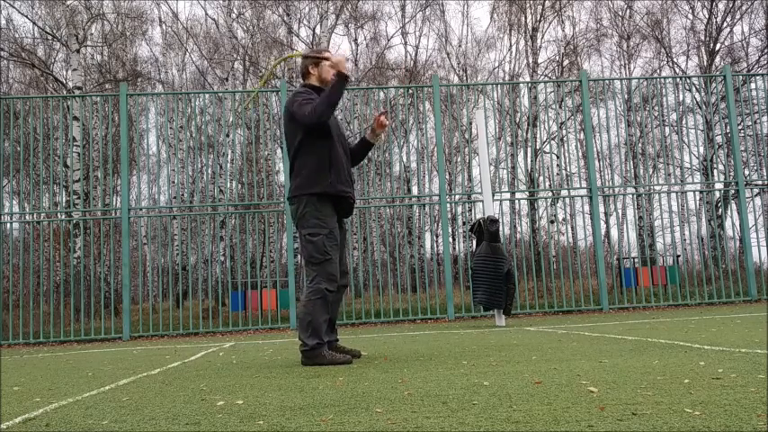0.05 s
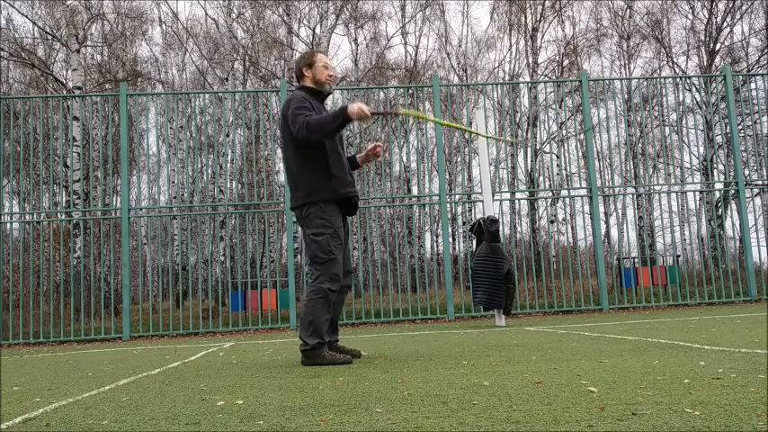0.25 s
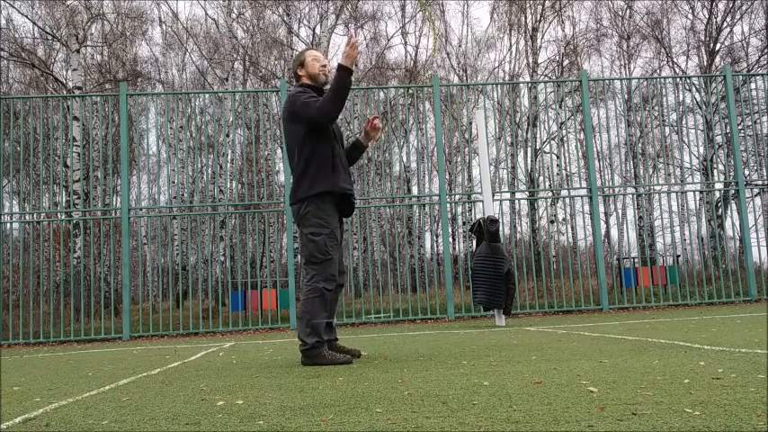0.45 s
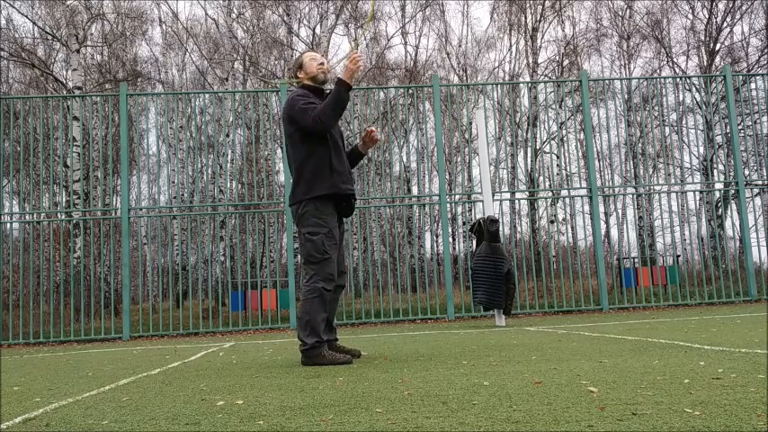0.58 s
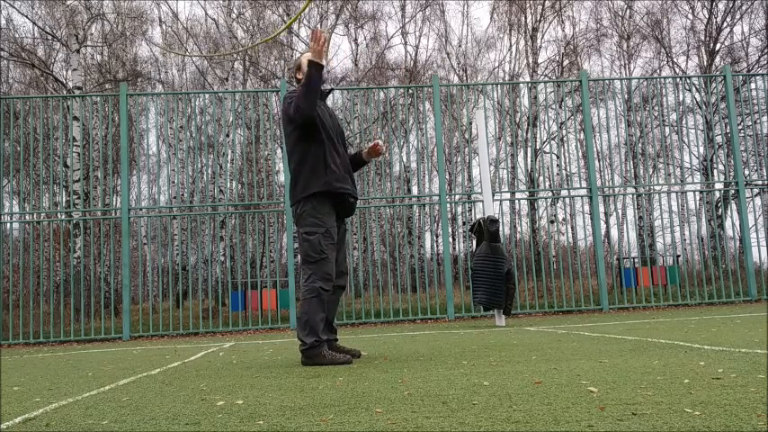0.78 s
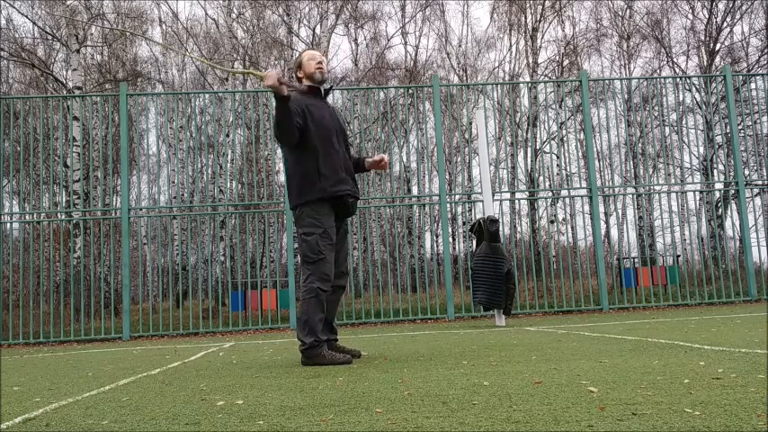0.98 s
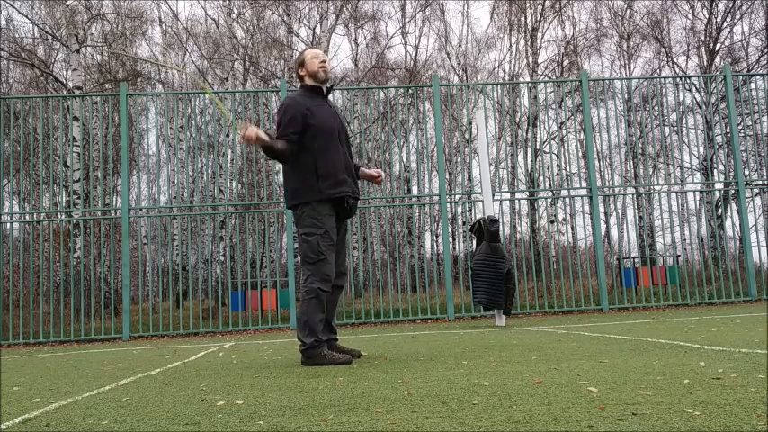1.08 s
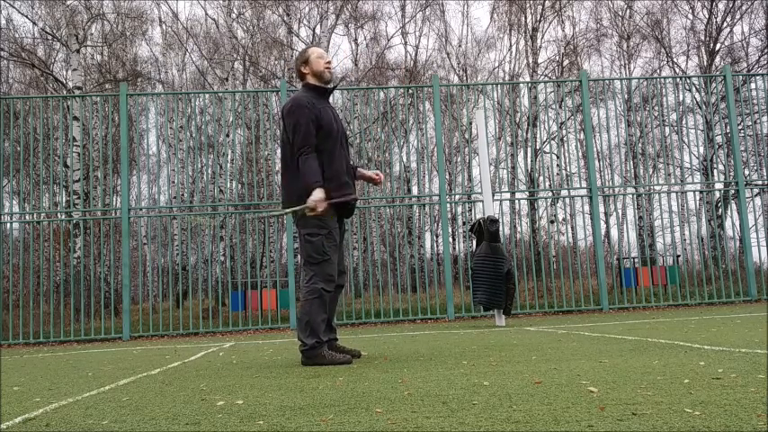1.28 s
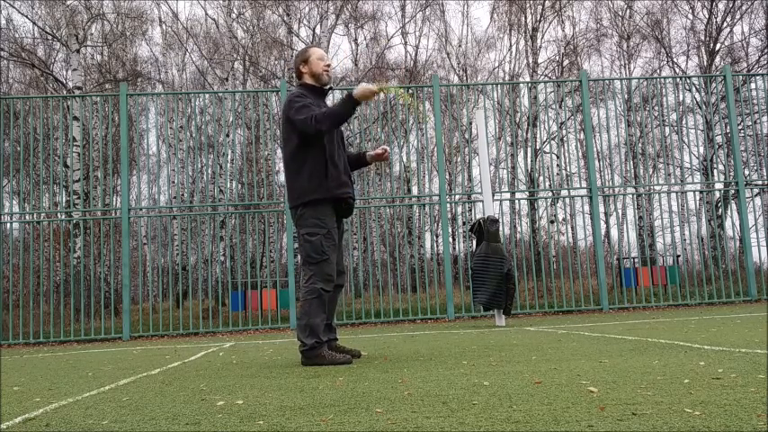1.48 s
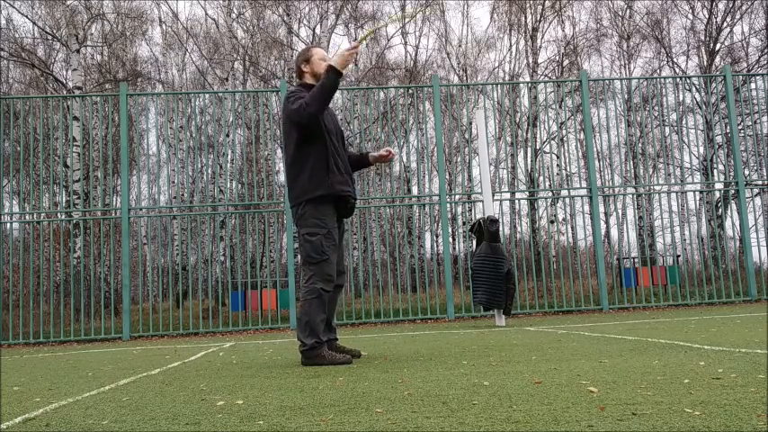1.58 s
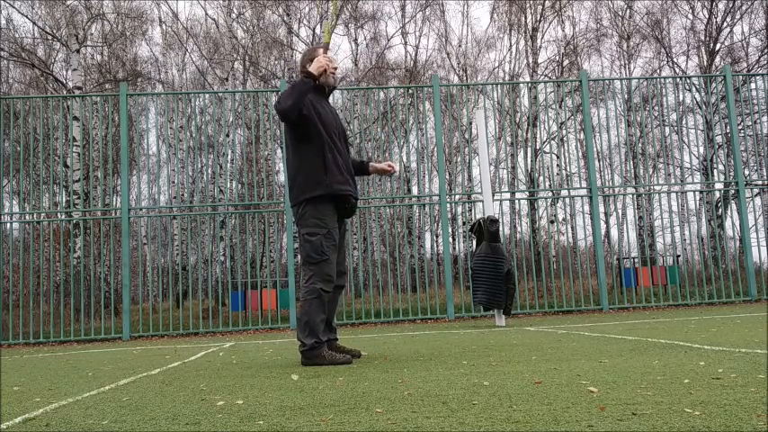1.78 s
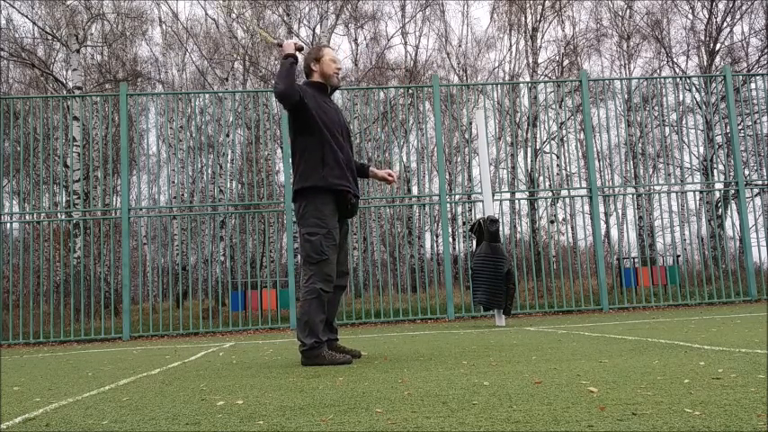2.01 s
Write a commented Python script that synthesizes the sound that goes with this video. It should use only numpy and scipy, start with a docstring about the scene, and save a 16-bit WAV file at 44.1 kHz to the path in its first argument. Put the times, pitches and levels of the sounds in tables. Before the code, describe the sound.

A long whip swings with a rising whistle and hiss, then cracks sharply at about 0.3 seconds. Brief falling chirps bounce off a fence, a soft thud follows, and the echo among trees dulls and fades by about 1.2 seconds. At 1.5 seconds the slack whip lands with a slapping thud, then swishes again until nearly 2 seconds without cracking. Distant traffic rumbles faintly throughout.

```python
"""Over a rumble of distant traffic, a long whip whistles and hisses on a fenced court among bare trees.
The swung thong sheds eddies, which make the whistles; slack, it thuds. The crack is a shock wave:
fence bars return it as falling chirps, trunks scatter it into a tail that loses its treble.
Two spaced microphones. More swings follow."""
import sys
import numpy as np
from scipy import signal
from scipy.io import wavfile

SR = 44100
rng = np.random.default_rng(int(sys.argv[2]) if len(sys.argv) > 2 else 0)


def dump(signal):
    """Clip the signal to [-1, 1] and save it as 16-bit WAV at the path in sys.argv[1]."""
    limited = np.clip(np.atleast_2d(signal).T, -1, 1)
    pcm = np.round(limited * 32767).astype(np.int16)
    wavfile.write(sys.argv[1], SR, pcm)


N = 90404
T = np.arange(N) / SR

# Traffic spectrum. Each row: frequency in Hz, relative density in dB.
TRAFFIC_SPECTRUM = [(12, -34), (20, -4), (63, -4), (204, -20.5), (241, -25), (337, -25.5), (377, -26),
                    (759, -24), (1090, -30), (4540, -46.5), (5850, -51), (14700, -49.5), (16000, -45.5)]
# Faint far tones. Each row: frequency in Hz, width in Hz, level in dB.
FAR_HUMS = [(371, 8, -63), (809, 8, -66)]
# Likeness of noise at the two microphones. Each row: frequency in Hz, correlation.
MIC_CORRELATION = [(60, 0.98), (180, 0.93), (550, -0.066), (1650, -0.26), (4970, 0.086), (15000, 0.0081)]
# Thong whistles, one list per swing. Each row: time in seconds, low whistle level in dB,
# its pitch in Hz, high whistle level in dB, its pitch in Hz.
SWING_WHISTLES = [
    [(0.06, -55, 408.6, -80, 836), (0.082, -56, 417, -72, 824), (0.086, -57, 428, -74, 817),
     (0.12, -56, 432, -90, 831), (0.14, -55.5, 431.2, -63, 820), (0.17, -44.5, 443.5, -62, 1035),
     (0.202, -46, 475, -38, 1125), (0.23, -29.5, 448.6, -42.5, 979), (0.246, -62, 451, -44, 1002),
     (0.26, -46, 390, -43.5, 1037), (0.276, -49, 340.4, -49.5, 1043), (0.302, -35, 342.7, -48, 1130),
     (0.306, -37, 342, -45.5, 1130)],
    [(1.525, -29.5, 389.5, -49, 928), (1.559, -78, 371.9, -61, 940), (1.573, -66, 349.5, -78, 901),
     (1.589, -54, 353, -65, 917), (1.601, -69, 357, -79, 956.5), (1.609, -51, 345.7, -58, 995.4),
     (1.643, -44.5, 387.3, -72, 1010), (1.657, -50, 387.3, -66, 981), (1.715, -48, 371, -52.5, 1000),
     (1.747, -67, 359.4, -50, 847.6), (1.793, -61, 513.6, -58, 785.6), (1.819, -73, 487, -51, 764),
     (1.875, -71, 409, -57.5, 779), (1.893, -77, 429, -82.5, 820), (1.95, -87, 450, -73, 1046)],
]
# Hiss envelopes, one list per stroke. Each row: time in seconds, level in dB.
HISS_ENVELOPES = [
    [(0.08, -71), (0.124, -64.5), (0.192, -50.5), (0.296, -45), (0.321, -36)],
    [(1.34, -73), (1.35, -79), (1.36, -65.5), (1.438, -63), (1.46, -70), (1.498, -63), (1.503, -51)],
    [(1.525, -52), (1.575, -57), (1.643, -50.5), (1.675, -41), (1.693, -51), (1.717, -60), (1.85, -69.5)],
]
# Thong hiss spectrum. Each row: frequency in Hz, relative density in dB.
HISS_SPECTRUM = [(880, 4), (1500, -9), (2410, -5), (3120, -3), (3920, -7.5), (10900, -0.5), (14900, -5.5),
                 (16000, -8)]
# Short whistles of the thin tip. Each row: start in seconds, length in seconds,
# start pitch in Hz, target pitch in Hz, level in dB, right lag in seconds.
TIP_ZIPS = [(0.191, 0.032, 1900, 1860, -57, .0001), (0.259, 0.029, 1400, 1570, -48, 0.000074),
            (0.265, 0.032, 2300, 1860, -52.5, 0.000069), (0.287, 0.02, 1200, 1397, -44, 0.000076),
            (0.308, 0.033, 1600, 1990, -36, 0.00016), (0.3125, .012, 860, 900, -28, .0001),
            (1.656, 0.0231, 950, 1473, -49, 0.00012), (1.669, .014, 3355, 2630, -43, 0.00011),
            (1.68, 0.022, 2400, 2117, -49.5, 0.00017)]
# Slack thong blows. Each row: start in seconds, level in dB, right lag in seconds, contact in seconds.
THONG_BLOWS = [(0.2042, -24.5, .0001, 0.00077), (0.4376, -19.5, -.0001, 0.0012),
               (1.5057, -5.5, -.00015, 0.00094), (1.5504, -30.5, -.0001, 0.00054)]
# Hollow ring of a blow. Each row: frequency in Hz, relative level in dB, T60 in seconds.
RING_MODES = [(158.7, -35, 0.57), (241, -4.5, 0.03), (997, -20, 0.0258), (2820, -26, .04)]
# Run-up, crack and single echoes. Each row: peak time in seconds, spray level in dB, spread in seconds,
# right lag in seconds, shock level in dB, early sweep pitch in Hz, late sweep pitch in Hz.
CRACK_ARRIVALS = [(0.3250, -36, .004, .0001, -36, 1800, 2500),
                  (0.3291, -21, .0015, -.0001, -19, 4600, 4900),
                  (0.3321, -13, .0011, .00003, -14, 100, 4200),
                  (0.3379, -27, .0008, .00002, -22, 100, 1500),
                  (0.3648, -24, .0007, .00005, -17, 1800, 3000),
                  (0.3825, -24, .0012, .0001, -26, 300, 1500),
                  (0.3890, -18, .0008, .00005, -15, 4500, 3000),
                  (0.4790, -23, .003, .0002, -24, 5800, 6300)]
# Scattered echo envelope. Each row: time in seconds, level before dulling in dB.
WOODS_ENVELOPE = [(0.331, -34.5), (0.336, -27.5), (0.343, -28.5), (0.358, -41), (0.364, -26.5),
                  (0.378, -23.5), (0.382, -17.5), (0.41, -20), (0.468, -27), (0.476, -25.5), (0.483, -25),
                  (0.54, -33.5), (0.75, -43.5), (1.184, -71.5), (1.3, -73.5)]
# Scattered echo spectrum. Each row: frequency in Hz, relative density in dB.
WOODS_SPECTRUM = [(180, -67.5), (300, -18.5), (418, -6.5), (1390, -8), (3130, -1), (4160, -1), (5340, 0.5),
                  (12700, -10.5), (14700, -49.5), (16000, -10)]
# Growing tilt of that echo, lows up and treble down. Each row: frequency in Hz, gain rate in dB/s.
DULLING_RATES = [(300, 23), (700, 22.5), (1500, 30.5), (2200, 32), (3500, 23.2), (6000, -5.5), (10000, -56),
                 (15000, -62.5)]
# Fence bar returns. Each row: as in TIP_ZIPS.
FENCE_ECHOES = [(0.364, 0.0161, 3348, 2016, -20, 0.000201), (0.3825, 0.006, 8800, 6800, -21.5, 0.0000076),
                (0.384, 0.0086, 5000, 2890, -37, 0.00011), (0.393, 0.022, 3900, 2980, -23.5, 0.000018),
                (0.398, 0.019, 4550, 3685, -20, 0.0001), (0.4, .05, 5970, 5220, -26.5, 0.0000092)]


def from_db(db):
    """Decibels to gain."""
    return 10 ** (np.asarray(db) / 20)


def unit_rms(x):
    """Scale to RMS 1."""
    return x / np.sqrt(np.mean(x ** 2) + 1e-20)


def at_hz(table, hz):
    """Interpolate a table over log frequency."""
    table_hz, values = np.transpose(table)
    return np.interp(np.log(hz), np.log(table_hz), values)


def drift(rate_hz):
    """Smooth random motion, RMS about 1."""
    hop = 40
    pole = np.exp(-2 * np.pi * rate_hz * hop / SR)
    slow = signal.lfilter([1], [1, -2 * pole, pole ** 2], rng.standard_normal(N // hop + 2002))[2000:]
    return np.interp(np.arange(N) / hop, np.arange(len(slow)), unit_rms(slow))


def band(x, low_hz, high_hz):
    """Band-pass."""
    return signal.sosfilt(signal.butter(2, [low_hz, high_hz], "band", fs=SR, output="sos"), x)


def mic_pair(x, lag_s):
    """One source at both microphones, the right later by lag_s."""
    return np.array([np.interp(T + lag_s / 2, T, x), np.interp(T - lag_s / 2, T, x)])


def decay(start_s, t60_s):
    """Sudden onset, exponential fall."""
    return (T >= start_s) * from_db(-60 * np.maximum(T - start_s, 0) / t60_s)


def stroke_curves(strokes):
    """A gate, open during each stroke, then each column over time."""
    times_s, *columns = np.transpose(np.concatenate(strokes))
    gate = sum((T > rows[0][0]) & (T < rows[-1][0]) for rows in strokes)
    return gate, *[np.interp(T, times_s, column) for column in columns]


def banded_noise(spectrum, flicker_db, dulled_s=0):
    """Stereo noise in third octaves, each with its own level, flicker, correlation and dulling."""
    out, power = 0, 0
    edges_hz = 20 * 2 ** (np.arange(31) / 3)
    white = rng.standard_normal((2, 2, N + 8000))
    for k, (low_hz, high_hz) in enumerate(zip(edges_hz, edges_hz[1:])):
        mid, side = band(white[k % 2], low_hz, high_hz)[:, 8000:]
        hz = np.sqrt(low_hz * high_hz)
        correlation = np.clip(at_hz(MIC_CORRELATION, hz), -.9, .99)
        stereo = np.sqrt(1 + correlation) * mid + np.sqrt(1 - correlation) * side * [[1], [-1]]
        band_db = at_hz(spectrum, hz)
        dulling_db = at_hz(DULLING_RATES, hz) * dulled_s
        out += from_db(band_db + dulling_db + flicker_db * drift(rate_hz=16.7)) * stereo
        power += from_db(band_db) ** 2 * (high_hz - low_hz) * 4 / SR
    return out / np.sqrt(power)


def wavering_tone(hz, width_hz, steady_gain=1.1):
    """A steady tone plus narrow noise: amplitude and phase wander."""
    pole = np.exp(-np.pi * width_hz / SR)
    wander = unit_rms(signal.lfilter([1], [1, -2 * pole, pole ** 2], rng.standard_normal((2, N))))
    phase = 2 * np.pi * np.cumsum(np.broadcast_to(hz, N)) / SR
    return unit_rms((steady_gain + wander[0]) * np.cos(phase) + wander[1] * np.sin(phase))


def chirp(start_s, length_s, from_hz, to_hz, db, lag_s):
    """A glide that levels out, under a smooth hump."""
    progress = np.clip((T - start_s) / length_s, 0, 1)
    hump = np.sin(np.pi * np.sqrt(progress))
    hz = to_hz + (from_hz - to_hz) * np.exp(-3 * progress)
    return mic_pair(from_db(db) * hump * wavering_tone(hz, width_hz=380), lag_s)


def traffic():
    """Distant traffic: a low, slightly flickering rumble."""
    return from_db(-42) * banded_noise(TRAFFIC_SPECTRUM, flicker_db=1.52)


def far_hums():
    """Faint, slowly wavering tones."""
    hums = sum(from_db(db) * wavering_tone(hz, width_hz) for hz, width_hz, db in FAR_HUMS)
    return mic_pair(hums, lag_s=0.00043)


def swings():
    """The thong sheds eddies: two whistles and a hiss, with zips from the thin tip."""
    swinging, low_db, low_hz, high_db, high_hz = stroke_curves(SWING_WHISTLES)
    low = from_db(low_db) * wavering_tone(low_hz, width_hz=170)
    high = from_db(high_db) * wavering_tone(high_hz, width_hz=170)
    hissing, hiss_db = stroke_curves(HISS_ENVELOPES)
    hiss = hissing * from_db(hiss_db) * banded_noise(HISS_SPECTRUM, flicker_db=-3.0)
    zips = sum(chirp(*row) for row in TIP_ZIPS)
    return mic_pair(swinging * (low + high), lag_s=0.000089) + hiss + zips


def thuds(bounce_s=0.00399, bounce_db=-7):
    """The slack thong lands: soft blow, ground bounce, hollow ring, bright slap, dull tail."""
    out = 0
    noise = rng.standard_normal((2, N))
    for start_s, db, lag_s, contact_s in THONG_BLOWS:
        blow, bounce = (np.sin(np.pi * np.clip((T - onset_s) / contact_s, 0, 1)) ** 2
                        for onset_s in (start_s, start_s + bounce_s))
        push = -blow - from_db(bounce_db) * bounce
        peak_s = start_s + contact_s / 2
        ring = sum(from_db(mode_db) * decay(peak_s, t60_s) * np.sin(2 * np.pi * hz * (T - peak_s))
                   for hz, mode_db, t60_s in RING_MODES)
        slap = from_db(-28.5) * decay(start_s, t60_s=0.076) * unit_rms(band(noise, 1700, 18670))
        tail = from_db(-28) * decay(start_s + 0.0036, t60_s=0.17) * unit_rms(band(noise, 250, 1389))
        out += from_db(db) * (mic_pair(push + ring, lag_s) + slap + tail)
    return out


def cracks(snap_hz=5340, push_db=-12.5):
    """Each arrival: a shock smeared into a fast sweep over a low push, in a bright noise spray."""
    out = 0
    for peak_s, spray_db, spread_s, lag_s, shock_db, from_hz, to_hz in CRACK_ARRIVALS:
        offset = np.clip((T - peak_s) / spread_s, -9, 9)
        noise = rng.standard_normal((2, N))
        bright = unit_rms(.75 * band(noise, 2000, 14500) + band(noise, snap_hz * .8, snap_hz * 1.2))
        spray = np.exp(-offset ** 2 / 2) * bright
        cycles = spread_s * offset * ((from_hz + to_hz) / 2 + (to_hz - from_hz) * offset / 6)
        shock = np.exp(-offset ** 2) * (np.sin(2 * np.pi * cycles) - from_db(push_db))
        out += from_db(spray_db) * spray + from_db(shock_db) * mic_pair(shock, lag_s)
    return out


def woods_echo(dull_from_s=0.47, dull_for_s=0.44, crackle_db=1):
    """Countless trunks scatter the crack; later returns have lost their treble."""
    times_s, levels_db = np.transpose(WOODS_ENVELOPE)
    envelope_db = np.interp(T, times_s, levels_db, left=-120, right=-120)
    dulled_s = np.clip(T - dull_from_s, 0, dull_for_s)
    scatter = banded_noise(WOODS_SPECTRUM, flicker_db=1.5, dulled_s=dulled_s)
    return from_db(envelope_db + crackle_db * drift(rate_hz=264.3)) * scatter


def fence_echo():
    """Bars return the crack one after another, heard as falling chirps."""
    return sum(chirp(*row) for row in FENCE_ECHOES)


def scene():
    """Background, whip and echoes, in stereo."""
    background = traffic() + far_hums()
    whip = swings() + thuds() + cracks()
    return background + whip + woods_echo() + fence_echo()


def record(dry, left_louder_db=0.43, stopband_hz=16500):
    """Slight lean to the left, then a steep low-pass."""
    leaning = dry * from_db([[left_louder_db / 2], [-left_louder_db / 2]])
    return signal.sosfilt(signal.cheby2(12, 70, stopband_hz, fs=SR, output="sos"), leaning)


dry = scene()
out = record(dry)
dump(out)
```